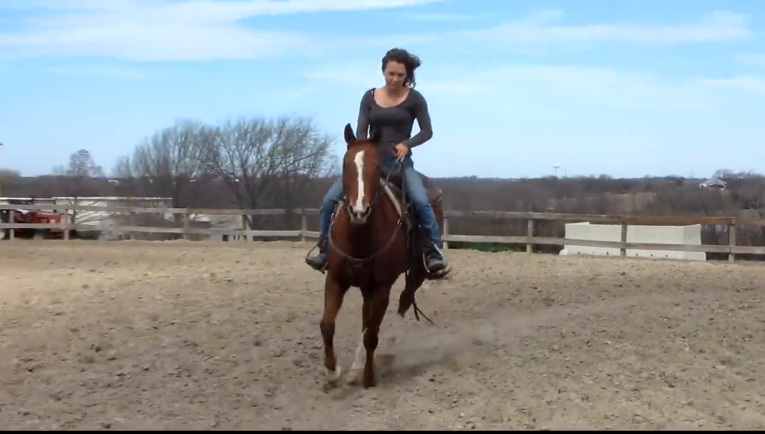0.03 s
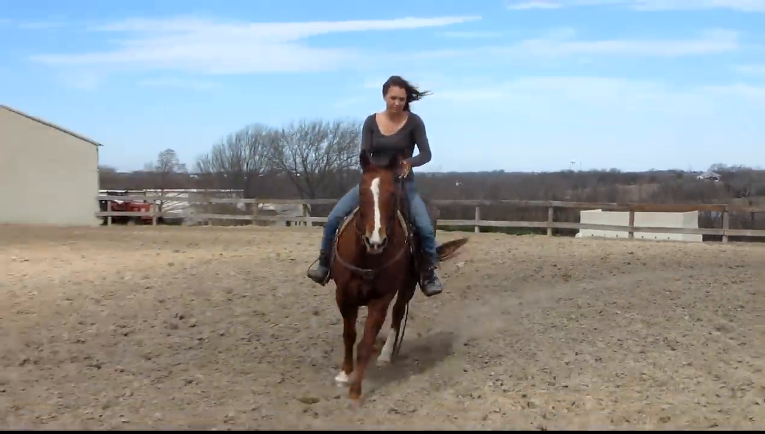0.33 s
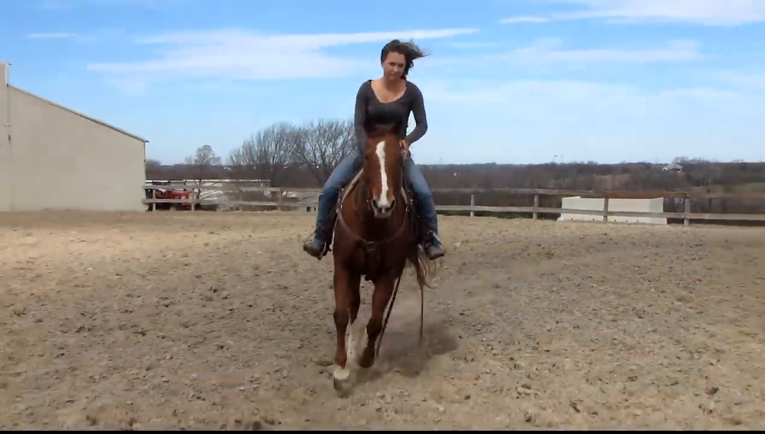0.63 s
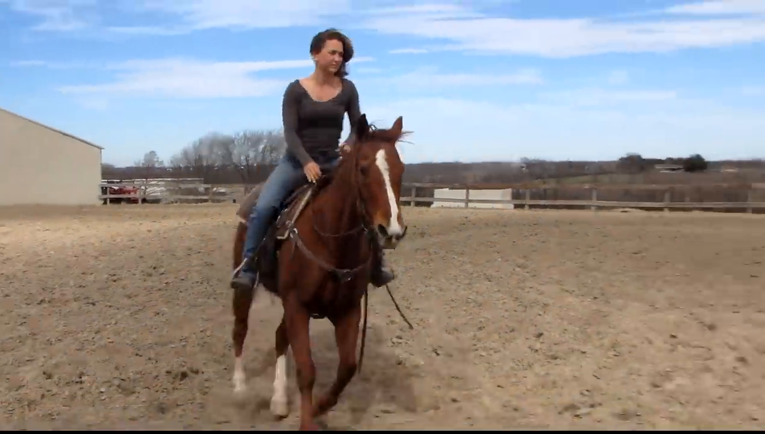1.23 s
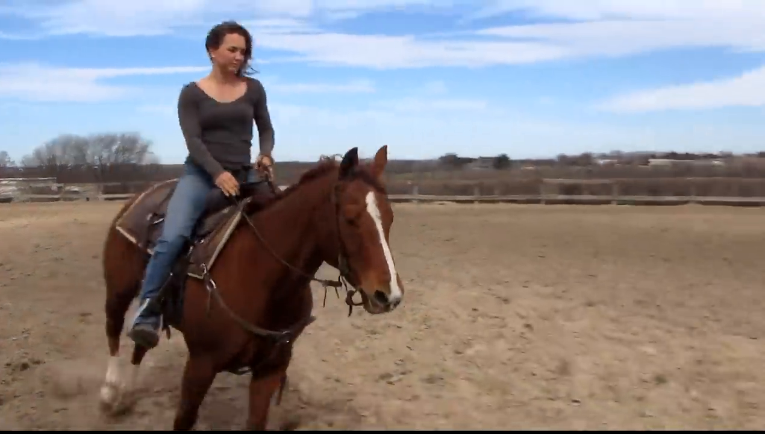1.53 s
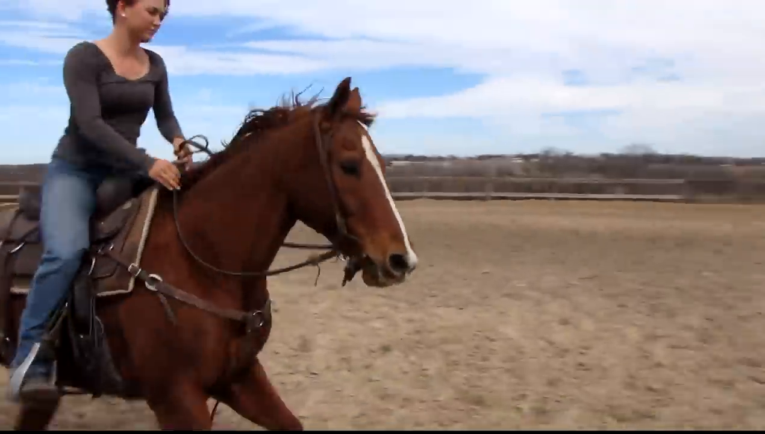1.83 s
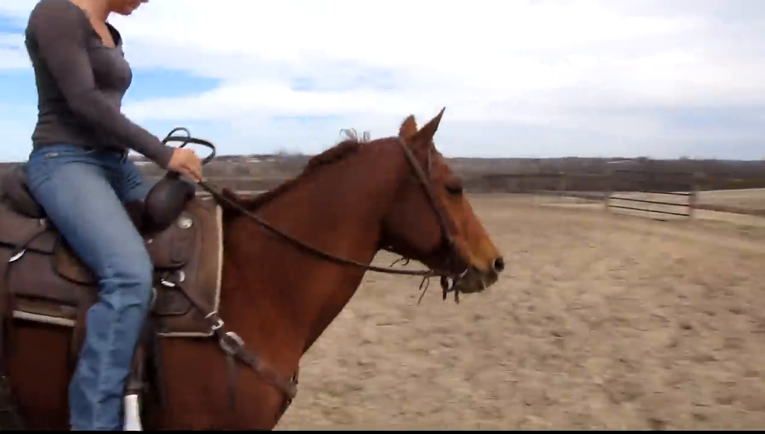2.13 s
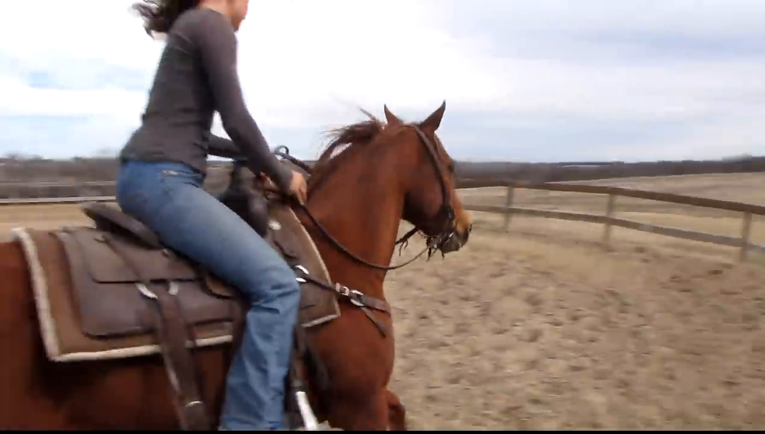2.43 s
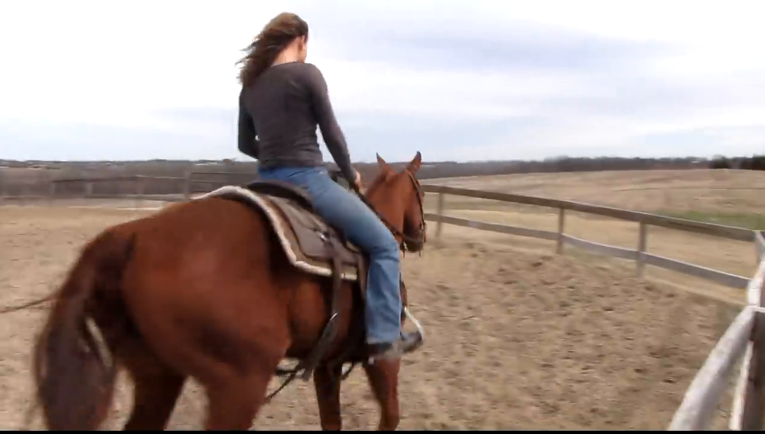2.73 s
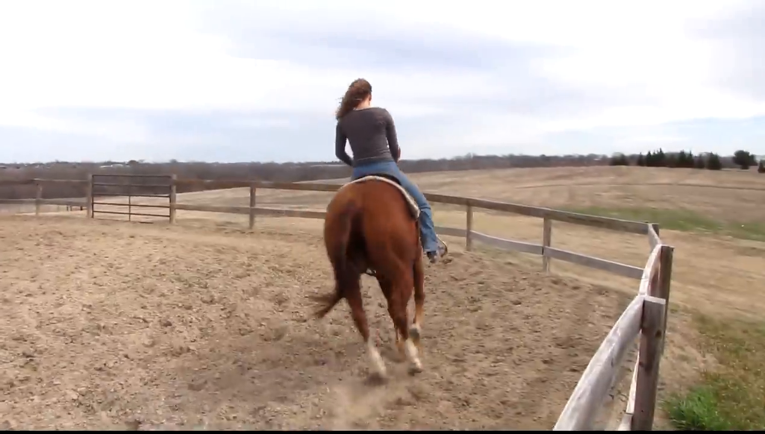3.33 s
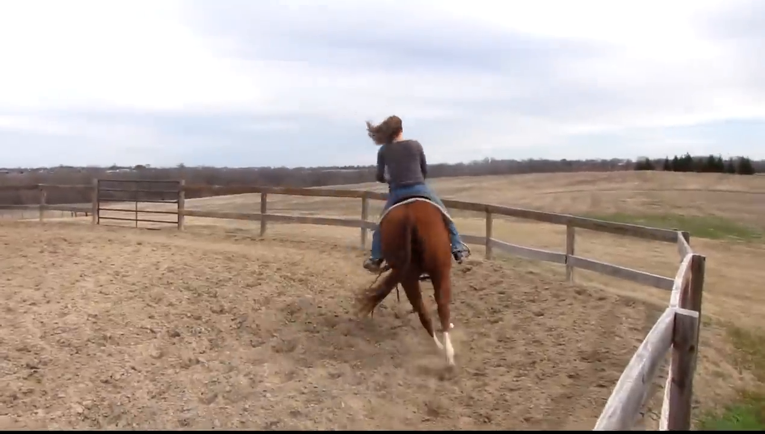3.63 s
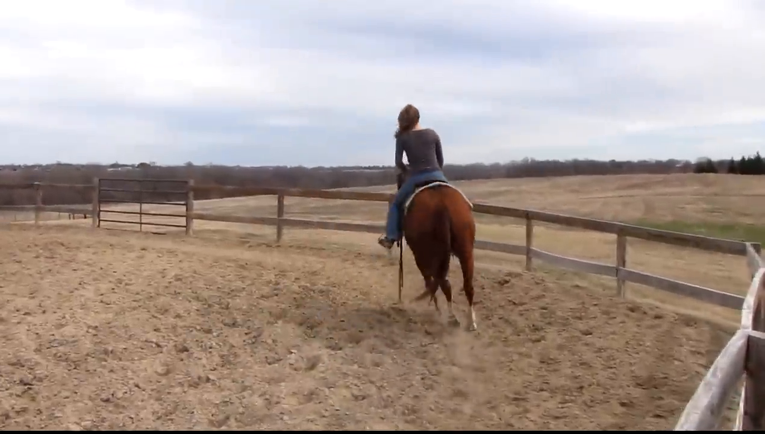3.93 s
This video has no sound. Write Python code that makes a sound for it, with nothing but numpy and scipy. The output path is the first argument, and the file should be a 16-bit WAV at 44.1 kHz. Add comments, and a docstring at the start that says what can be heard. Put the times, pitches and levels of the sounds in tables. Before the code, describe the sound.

Gusty wind rumbles against the microphone outdoors. In a lull, a passing horse's dull hoofbeats on sand come through with light clinks and a brief saddle creak, before the wind picks up again over them.

```python
"""Gusts of wind buffet and boom at two microphone ports while a horse lopes past in a sand arena.
Eddies hit each port separately, drop away as the horse goes by, and return near the end.
In the lull the hooves thud and throw sand, and the tack sounds: a steel snap clinks, buckles knock,
and rubbing metal squeals or slips in a stuttering creak. A soft hiss with pattering grit lies behind."""
import sys
import numpy as np
from scipy import signal
from scipy.fft import rfft, irfft
from scipy.io import wavfile

SR = 44100
rng = np.random.default_rng(int(sys.argv[2]) if len(sys.argv) > 2 else 0)


def transcribe(signal):
    """Save signal, clipped to [-1, 1], as a 16-bit WAV file at the path in sys.argv[1]."""
    frames = np.atleast_2d(signal).T
    limited = np.clip(frames, -1, 1)
    pcm = np.round(limited * 32767).astype(np.int16)
    wavfile.write(sys.argv[1], SR, pcm)


N = 176400
T = np.arange(N) / SR
HZ = np.fft.rfftfreq(N, 1 / SR)

# tone of falling sand (frequency [Hz], relative level [dB])
SAND_SPECTRUM = [(100, -5), (400, 8), (900, 2.5), (1800, 5.5), (3000, 4), (5000, -1.5), (9000, -7),
                 (13000, -11), (16000, -17)]


def wind(buffet_db=-2, boom_db=-22.5, full_rumble_db=-19.5, boom_growth=1.81, shared=0.15):
    """Deep sway is nearly always there; booming and buffeting come with each port's own gusts."""
    # gust strength driving the buffeting at each port (time [s], level [dB])
    gusts_left = [(0, -13), (.08, -13.5), (.1, -9.5), (.19, -23), (.28, -14.5), (.41, -26.5), (.49, -17),
                  (.545, -27), (.61, -17), (.65, -25), (.68, -15), (.75, -27.5), (.772, -19), (.93, -35),
                  (.98, -26), (1.06, -36), (1.15, -19), (1.25, -38.5), (1.28, -22), (1.34, -33.5),
                  (1.39, -16.5), (1.475, -41.5), (1.515, -16), (1.61, -44), (1.67, -30), (1.79, -56.5),
                  (1.875, -31), (1.94, -82), (2.02, -36.5), (2.1, -63), (3.12, -81), (3.205, -27),
                  (3.36, -75), (3.66, -40.5), (3.81, -57), (4, -40.5)]
    gusts_right = [(0, -22.5), (.14, -14.5), (.2, -25.5), (.27, -18.5), (.41, -27), (.5, -20), (0.54, -32),
                   (0.63, -20.5), (0.66, -44.5), (0.69, -36), (0.75, -60), (0.78, -24), (0.86, -40),
                   (0.9, -30), (0.92, -54), (0.98, -30), (1.07, -62), (1.09, -43.5), (1.22, -31),
                   (1.32, -67), (1.39, -28.5), (1.5, -66), (1.55, -29), (1.61, -48), (1.66, -35),
                   (1.72, -66), (1.74, -32), (1.81, -64), (3.07, -65), (3.17, -29.5), (3.27, -45.5),
                   (3.56, -45), (3.6, -31), (3.65, -69), (3.68, -34.5), (3.78, -45.5), (4.0, -42)]
    # gust strength driving the boom at each port (time [s], level [dB])
    rumble_left = [(0, -55.5), (.68, -14.5), (.9, -23.5), (1.35, -17.5), (1.55, -19), (1.79, -26),
                   (1.87, -22), (1.96, -28), (2.55, -29.5), (2.75, -60), (3.2, -23), (3.4, -30),
                   (3.55, -23), (3.77, -37), (4, -21)]
    rumble_right = [(0, -17), (.77, -22), (1.06, -24.5), (1.38, -22.5), (2.1, -36), (2.75, -39),
                    (3.06, -29), (3.17, -18.5), (3.4, -25), (3.61, -18.5), (3.85, -24.5), (4, -21.5)]
    # tone of the two low layers (frequency [Hz], relative level [dB])
    sway_spectrum = [(10, -1), (28, 4.5), (65, 5), (130, -27.5), (600, -75.5)]
    boom_spectrum = [(35, -19.5), (100, 3), (170, -6), (380, -26.5), (2500, -95)]
    # swells of the sway at both ports (time [s], level [dB])
    sway_level = [(0, -28.5), (1.15, -31.5), (1.32, -23), (1.6, -31.5), (2.2, -34), (2.75, -38), (2.9, -23),
                  (3.05, -32.5), (3.2, -20), (3.35, -32.5), (3.56, -12), (3.8, -37.5)]
    noise = rng.standard_normal((2, N)) + shared * rng.standard_normal(N)
    gust_db = np.array([curve(rumble_left), curve(rumble_right)]) - full_rumble_db
    sway = colour(noise, sway_spectrum) * amp(curve(sway_level))
    boom = colour(noise, boom_spectrum) * amp(boom_db + boom_growth * gust_db)
    return sway + boom + amp(buffet_db) * np.array([buffet(gusts_left), buffet(gusts_right)])


def buffet(gusts, full_gust_db=-16.5, flutter_db=7, flutter_hz=139, ceiling_db=6.5, knee_db=5):
    """Eddies at one port: stronger wind is brighter, and each eddy flicks all the bands at once."""
    # (band centre [Hz], level re a full gust [dB], growth [dB per dB of gust], flutter depth [ratio])
    bands = [(175, -1.5, 0.63, 0.74), (272, -2, 0.98, 0.53), (559, -9.5, 1.09, 0.81),
             (930, -18, 0.93, 0.75), (1660, -22.5, 1.36, 1.1), (2920, -30.5, 1.48, 0.82),
             (4200, -40.5, 2.33, 1.4), (7170, -56, 0.91, 1.4)]
    gust_db = curve(gusts) - full_gust_db
    eddy_db = flutter_db * wander(flutter_hz)
    spectrum = rfft(rng.standard_normal(N)) / (1 + (HZ / 3800) ** 4)
    centres = np.log([row[0] for row in bands])
    edges = np.r_[centres[0] - 1, centres, centres[-1] + .35]
    out = np.zeros(N)
    for k, (_, db, growth, depth) in enumerate(bands):
        triangle = np.interp(np.log(HZ + 1), edges[k:k + 3], [0, 1, 0])
        band = unit(irfft(spectrum * triangle, N))
        push_db = growth * gust_db + depth * eddy_db
        push_db -= knee_db * np.logaddexp(0, (push_db - ceiling_db) / knee_db)  # soft ceiling
        out += band * amp(full_gust_db + db + push_db)
    return out


def hooves(thud_hz=155, thud_s=.008, clod_db=-11, clod_band_hz=(157, 306), sand_pan_db=-1):
    """Each hoof gives a dull push into the ground, a hollow crumble of clods and a spray of sand."""
    # landings and drags (time [s], thud level [dB], sand level [dB], spray decay [s])
    steps = [(1.86, -17, -58, 0.021), (1.905, -56, -44.5, 0.0078), (1.943, -55, -52.5, 0.018),
             (2.009, -28.5, -65, 0.025), (2.076, -53, -48.5, 0.012), (2.137, -35.5, -75, 0.027),
             (2.397, -31.5, -40.5, 0.0079), (2.501, -30, -43, 0.018), (2.551, -34, -63, 0.057),
             (2.634, -48, -43.5, 0.016), (2.729, -70, -52.5, 0.06), (2.834, -28.5, -93, .03),
             (2.899, -32, -47.5, 0.041), (3.042, -33, -43, 0.021), (3.138, -22, -51.5, 0.03),
             (3.163, -21, -67, 0.017), (3.322, -42, -44.5, 0.0075), (3.379, -37, -45.5, 0.011),
             (3.538, -26, -71, 0.01), (3.593, -18.5, -47, 0.043), (3.674, -22, -75, 0.015),
             (3.796, -30, -58, 0.029), (3.964, -34, -76, 0.026)]
    thuds, crumble, spray = np.zeros((2, N)), np.zeros((1, N)), np.zeros((1, N))
    t = T[:SR // 2]
    age = t / thud_s
    for s, thud_db, sand_db, decay_s in steps:
        hz = thud_hz * np.exp(0.167 * rng.standard_normal())
        push = age * np.exp(1 - age) * np.sin(2 * np.pi * hz * t)
        add(thuds, s, amp(thud_db) * push)
        add(crumble, s, amp(thud_db) * age / 2 * np.exp(1 - age / 2))
        attack = np.minimum(t / (.3 * decay_s), 1)
        add(spray, s, amp(sand_db) * attack * np.exp(-t / decay_s))
    hollow = signal.butter(2, clod_band_hz, "band", fs=SR, output="sos")
    clods = unit(signal.sosfilt(hollow, rng.standard_normal((2, N))))
    sand = colour(grains(per_s=4000), SAND_SPECTRUM)
    return thuds + amp(clod_db) * crumble * clods + pan(sand_pan_db) * spray * sand


def squeals(waver_hz=9, swell_db=1, settle_power=1.8, rasp_hz=900):
    """Rubbing metal sings on one mode with a little rasp, gliding and settling as the load changes."""
    # (time [s], length [s], start pitch [Hz], end pitch [Hz], level [dB], pan [dB], roughness [0-1])
    rubs = [(1.981, .03, 13900, 13400, -63, 14, .2), (2.007, 0.068, 13200, 12780, -51, 14.5, 0.1),
            (2.208, 0.115, 12950, 12720, -52, 9, 0.12), (3.573, .03, 1220, 1230, -43, 0, .2),
            (2.322, 0.036, 8260, 8300, -50, 2, 0.1), (3.346, 0.11, 12830, 13110, -45, 29, .02),
            (3.592, 0.162, 12900, 13080, -41.5, 18.5, .02), (3.856, 0.13, 12870, 13100, -44, 25.5, .02),
            (3.361, 0.034, 6420, 6530, -44.5, -5, 0.1), (3.595, 0.056, 6380, 6500, -41.5, -4.5, 0.2),
            (3.611, 0.03, 6400, 6300, -40, -4, 0.54), (3.654, 0.06, 6550, 6500, -47, -5, .05),
            (3.876, 0.048, 6490, 6525, -46, -5, 0.1)]
    out = np.zeros((2, N))
    waver, rasp, swell = wander(hz=80), wander(rasp_hz), wander(hz=40)
    for s, length, from_hz, to_hz, db, pan_db, rough in rubs:
        t = np.arange(0, length, 1 / SR)
        at = (round(s * SR) + np.arange(len(t))) % N
        hz = to_hz + (from_hz - to_hz) * (1 - t / length) ** settle_power + waver_hz * waver[at]
        tone = np.sin(2 * np.pi * np.cumsum(hz) / SR) * (1 - rough + rough * rasp[at])
        envelope = amp(db + swell_db * swell[at]) * rub_envelope(t, length)
        add(out, s, pan(pan_db) * envelope * unit(tone))
    return out


def creaks(ring_hz=12680, sideband_gain=0.5, leather_band_hz=(850, 2400), ring_pan_db=7.5):
    """Uneven slips chop the metal's high ring, and each one ticks in the leather as a dry rasp."""
    # (time [s], length [s], start rate [slips/s], middle rate [slips/s], end rate [slips/s], level [dB])
    stutters = [(2.16, 0.062, 837, 1233, 795, -48), (2.2207, 0.024, 1137, 897, 670, -50.5)]
    out = np.zeros((2, N))
    unsteady = .11 * wander(hz=900)
    leather = signal.butter(2, leather_band_hz, "band", fs=SR, output="sos")
    for s, length, first, middle, last, db in stutters:
        t = np.arange(0, length, 1 / SR)
        rate = np.polyval(np.polyfit([0, .5, 1], [first, middle, last], 2), t / length)
        slips = np.cumsum(rate * (1 + unsteady[:len(t)])) / SR
        ring_phase, slip_phase = 2 * np.pi * ring_hz * t, 2 * np.pi * slips
        ring = sum(sideband_gain ** abs(k) * np.sin(ring_phase + k * slip_phase) for k in range(-2, 2))
        ticks = np.diff(np.floor(slips), prepend=0) * rng.uniform(0.23, 1, len(t))
        rasp = unit(signal.sosfilt(leather, ticks)) * np.sin(np.pi * t / length)
        add(out, s, amp(db) * (pan(ring_pan_db) * ring + rasp) * rub_envelope(t, length))
    return out


def clinks(detune_share=0.01, uneven_db=4, rise_s=0.00083, rattle=0.74, tick_db=-3, tick_s=0.0049):
    """A small steel rein snap ticks, rings and rattles, a little differently at each touch."""
    # (time [s], level [dB])
    touches = [(0.317, -78), (0.415, -68), (.519, -75), (0.967, -64), (1.024, -68), (1.429, -69),
               (1.517, -62), (1.579, -65), (1.631, -68), (1.8025, -62), (1.947, -63.5), (2.057, -61),
               (2.1194, -62.5), (2.361, -60.5), (2.4927, -50), (2.6155, -55), (2.652, -58), (2.729, -51),
               (3.065, -62), (3.24, -57.5), (3.287, -49.5), (3.478, -53.5), (3.748, -46), (3.769, -69)]
    # the snap's ring (frequency [Hz], relative level [dB], t60 [s])
    modes = [(5940, 3.5, 0.058), (9000, -4.5, 0.046), (9700, -7.5, 0.04), (12760, -2, 0.062),
             (13050, -8, .06)]
    # the snap as the horse goes by and turns away (time [s], pan [dB], brightness [dB/octave])
    pass_by = [(1.5, 4.5, 0), (2.55, 5, 6.5), (3.2, 2, -0.5)]
    out, t = np.zeros((2, N)), T[:SR // 5]
    hz, db, t60 = np.transpose(modes)[:, :, None]
    when, pans, tilts = np.transpose(pass_by)
    treble = signal.butter(6, [hz.min(), hz.max()], "band", fs=SR, output="sos")
    attack = np.minimum(t / rise_s, 1)
    for s, level_db in touches:
        detune, uneven, phase = rng.standard_normal((3, len(modes), 1))
        tilt_db = np.interp(s, when, tilts) * np.log2(hz / hz[0])
        decays = amp(db + tilt_db + uneven_db * uneven - 60 * t / t60)
        partials = np.sin(2 * np.pi * (hz * (1 + detune_share * detune) * t + phase))
        ring = (decays * partials).sum(0)
        tick = amp(tick_db) * signal.sosfilt(treble, rng.standard_normal(len(t))) * np.exp(-t / tick_s)
        add(out, s, pan(np.interp(s, when, pans)) * amp(level_db) * (ring + tick) * attack)
    return out * (1 + rattle * np.array([wander(hz=300) for _ in out]))


def knocks(pan_db=-2, click_s=0.0041):
    """Hoof and buckle knock dryly: a click with one short ring."""
    # (time [s], level [dB], ring pitch [Hz], t60 [s], relative click level [dB])
    hits = [(2.2955, -42, 9900, 0.01, 1), (3.2012, -26, 2420, 0.018, -0.5)]
    out, t = np.zeros((2, N)), T[:SR // 10]
    for s, db, hz, t60, click_db in hits:
        lowpass = signal.butter(2, min(1.13 * hz, 15000), fs=SR, output="sos")
        click = signal.sosfilt(lowpass, rng.standard_normal((2, len(t)))) * np.exp(-t / click_s)
        ring = np.sin(2 * np.pi * hz * t) * amp(-60 * t / t60)
        add(out, s, pan(pan_db) * amp(db) * (ring + amp(click_db) * click))
    return out


def air(shared=0.94, flicker_db=3, grit_db=-6, grit_per_s=1500, clump_db=5.0):
    """A soft outdoor hiss, with kicked-up grit pattering down in clumps."""
    # tone of open air and far fields (frequency [Hz], relative level [dB])
    hiss_spectrum = [(60, 2.5), (400, 4.5), (900, 5.5), (1600, -4.5), (2800, -7.5), (4500, -13),
                     (9000, -17), (13500, -46.5), (16000, -32.5)]
    # fader for hiss and grit together (time [s], level [dB])
    bed_level = [(0, -69.5), (1.1, -64), (1.7, -59.5), (1.85, -57.5), (2.7, -57.5), (3.2, -56.5),
                 (3.6, -53.5), (4, -55)]
    noise = rng.standard_normal((2, N)) + shared * rng.standard_normal(N)
    hiss = colour(noise, hiss_spectrum) * amp(flicker_db * wander(hz=30) - 1.5)
    grit = colour(grains(grit_per_s) * amp(clump_db * wander(hz=25)), SAND_SPECTRUM)
    return (hiss + amp(grit_db) * grit) * amp(curve(bed_level))


def grains(per_s, spread_db=5, shared=0.8):
    """Sand grains click sparsely at very uneven sizes: one stream for each port and one for both."""
    size = amp(spread_db * np.minimum(rng.exponential(1, (3, N)), np.pi))
    clicks = size * rng.standard_normal((3, N)) * (rng.random((3, N)) < per_s / SR)
    return clicks[:2] + shared * clicks[2]


def off_axis(x, lag_ms=0.11):
    """Sound from one side reaches the left port a little later."""
    delay = np.exp(-2j * np.pi * HZ * lag_ms / 1000)
    return np.array([irfft(rfft(x[0]) * delay, N), x[1]])


def rub_envelope(t, length, edge_s=.009):
    """Quick start, hold, quick stop."""
    return np.clip(np.minimum(t, length - t) / edge_s, 0, 1)


def amp(db):
    """Decibels to gain."""
    return 10 ** (np.asarray(db) / 20)


def unit(x):
    """Scales to rms 1."""
    return x / np.sqrt(np.mean(x ** 2) + 1e-20)


def curve(points):
    """A control curve at every sample."""
    return np.interp(T, *np.transpose(points))


def colour(x, points):
    """Shapes x with an EQ curve, at rms 1."""
    hz, db = np.transpose(points)
    gain = amp(np.interp(np.log(HZ + 1), np.log(hz), db))
    return unit(irfft(rfft(x) * gain, N))


def wander(hz):
    """Random motion up to about the given rate, at rms 1."""
    return unit(irfft(rfft(rng.standard_normal(N)) / (1 + (HZ / hz) ** 4), N))


def pan(db):
    """Stereo gains for a left-minus-right level difference."""
    return amp(np.array([[db / 2], [-db / 2]]))


def add(mix, s, sound):
    """Mixes a sound in at s seconds."""
    part = mix[:, max(round(s * SR), 0):][:, :sound.shape[-1]]
    part += sound[..., :part.shape[1]]


def scene():
    """Wind up front, with horse, tack and open air behind it."""
    return wind() + air() + hooves() + creaks() + clinks() + off_axis(knocks() + squeals())


def record(dry):
    """A steep high cut takes off the very top."""
    high_cut = signal.firwin(511, cutoff=15800, window=("kaiser", 9), fs=SR)
    return signal.oaconvolve(dry, high_cut[None], "same")


dry = scene()
out = record(dry)
transcribe(out)
```